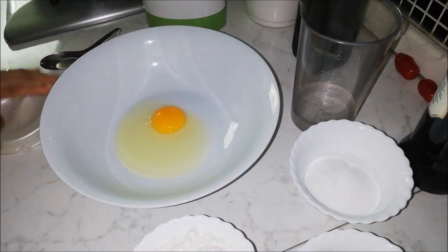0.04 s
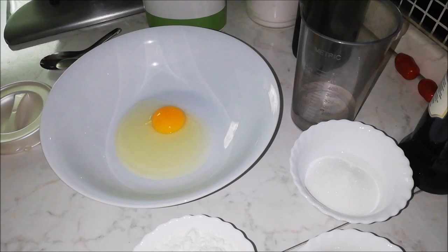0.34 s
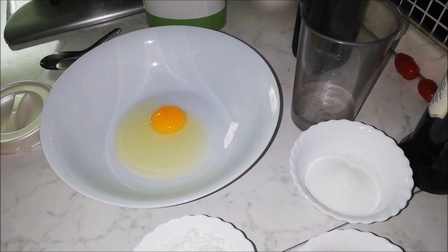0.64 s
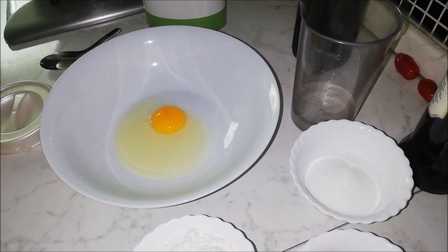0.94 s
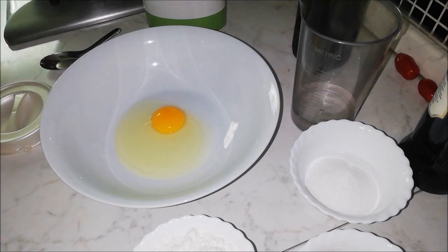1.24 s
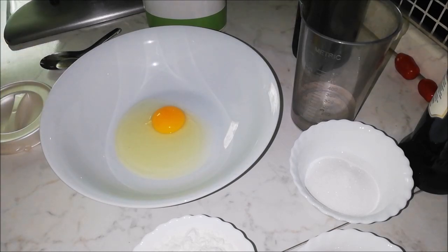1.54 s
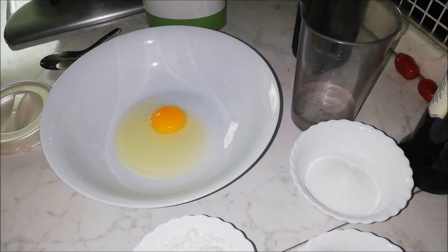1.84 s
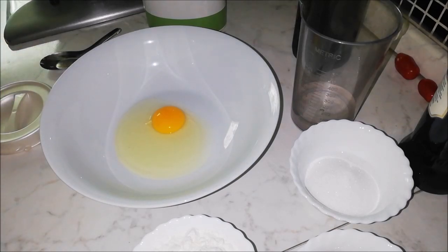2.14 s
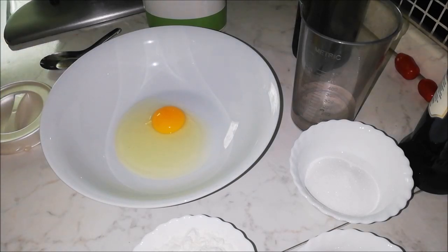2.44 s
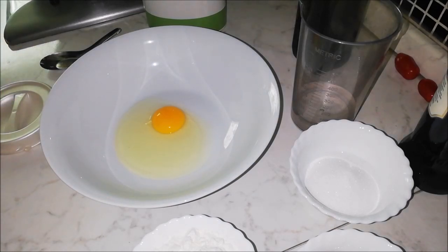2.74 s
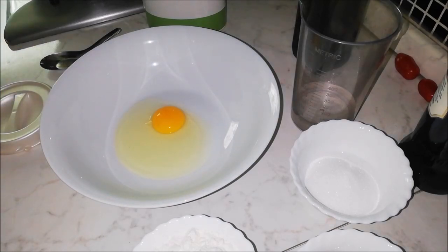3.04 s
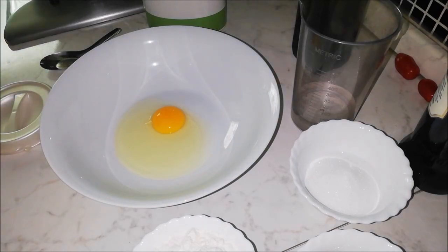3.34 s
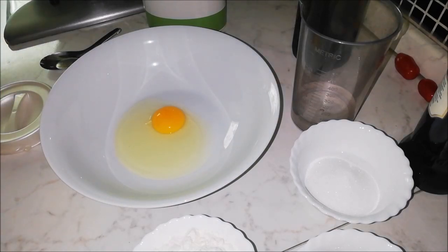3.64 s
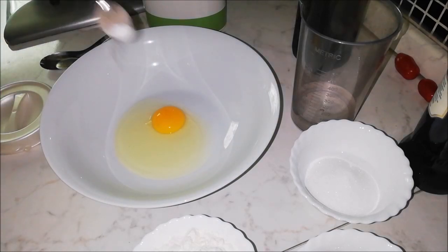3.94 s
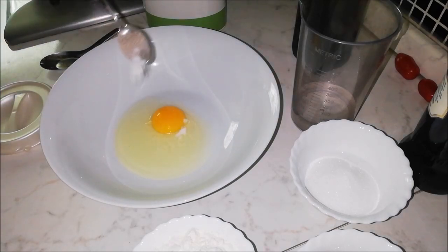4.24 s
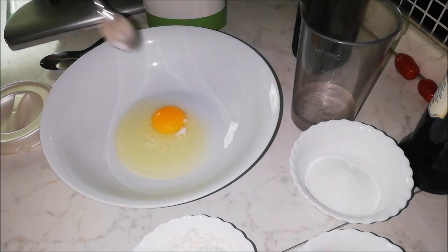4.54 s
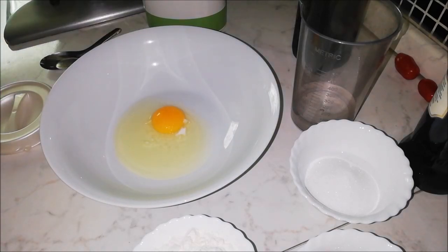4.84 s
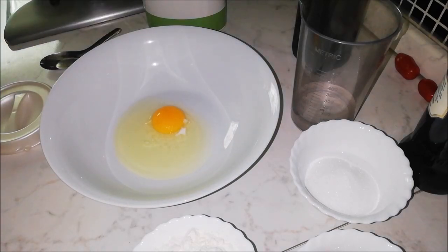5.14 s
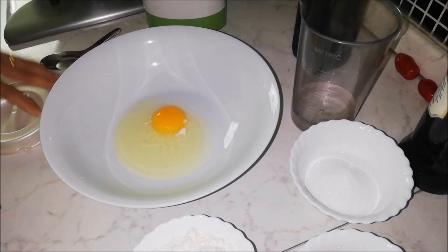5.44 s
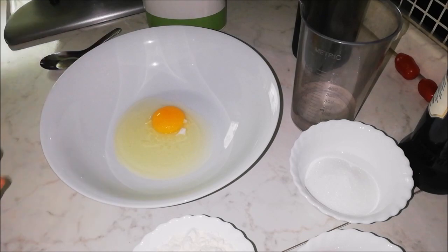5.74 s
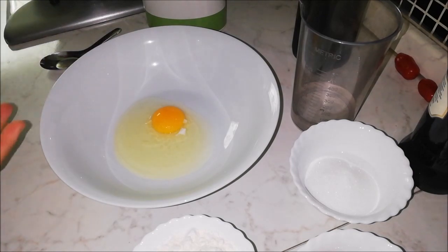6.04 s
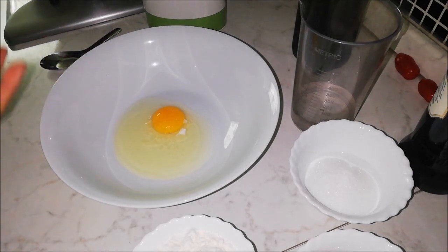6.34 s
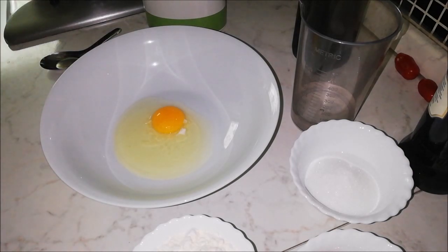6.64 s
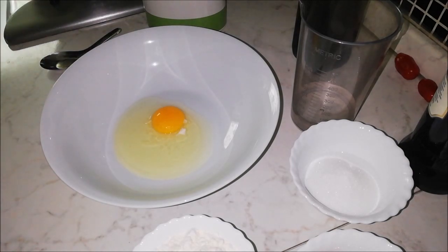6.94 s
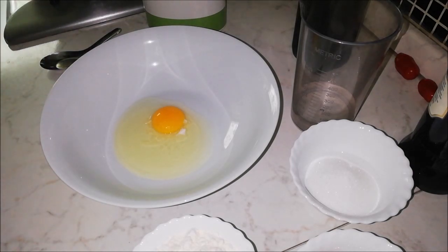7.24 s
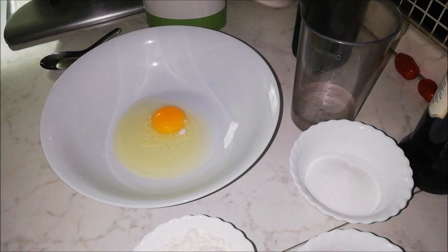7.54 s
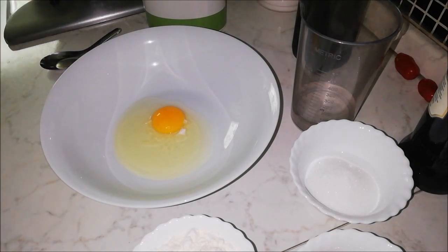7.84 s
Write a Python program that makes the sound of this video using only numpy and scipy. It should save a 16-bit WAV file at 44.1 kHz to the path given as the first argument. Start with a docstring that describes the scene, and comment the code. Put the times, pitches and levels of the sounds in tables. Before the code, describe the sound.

Soft scraping of a spoon in salt, a bright metal clatter and dull knocks of containers on a kitchen counter, over a faint hum.

```python
"""Salt at a kitchen counter

A hard lid is put down on stone and rocks to rest. A steel spoon scoops salt, sprinkles it into a bowl
and drops back into its container. The lid is pressed shut and containers are set down with dull knocks.
Each blow makes the things it hits ring and echoes in a small tiled kitchen, over a faint appliance hum."""
import sys
import numpy as np
from scipy import signal
from scipy.fft import rfft, irfft, next_fast_len
from scipy.io import wavfile
from scipy.ndimage import uniform_filter1d, map_coordinates

SR = 44100
rng = np.random.default_rng(int(sys.argv[2]) if len(sys.argv) > 2 else 0)


def transcribe(signal):
    """Save signal, clipped to [-1, 1], as a 16-bit WAV file at the path in sys.argv[1]."""
    frames = np.atleast_2d(signal).T
    limited = np.clip(frames, -1, 1)
    pcm = np.round(limited * 32767).astype(np.int16)
    wavfile.write(sys.argv[1], SR, pcm)


N = 352452
CLOCK = np.arange(N) / SR  # seconds into the scene
SIZE = 32768  # samples in one blow
T = np.arange(SIZE) / SR  # seconds into one blow
HZ = np.fft.rfftfreq(SIZE, 1 / SR)  # the frequencies in one blow


def lid():
    """The hard lid clacks on stone, rings and rocks to rest."""
    # each touch on the counter: start_s, level_db, brightness
    hits = [(0.0366, -15, -0.5), (0.039, -21.5, 1), (0.0503, -20.5, -2), (0.056, -26.5, -0.5),
            (0.438, -47.5, -1.5), (0.726, -54, -1), (0.979, -54, 0.5), (1.217, -57.5, -2),
            (1.436, -50, -1.5)]
    # tone of the clack: pitch_hz, level_db
    tone = [(47, -38), (80, -8), (162, -20.5), (230, -11.5), (358, -15.5), (391, -8), (1500, -2.5),
            (1670, -3.5), (3780, -8.5), (9130, -20.5), (14500, -37), (15500, -77)]
    # the lid's short notes: pitch_hz, width_hz, level_db
    short_notes = [(587, 48, -7), (853, 68, 7.5), (1130, 27, -0.5), (1183, 31, 6), (1204, 34, -10),
                   (1396, 19, 5), (2025, 36, 4.5), (2200, 18, -4.5), (2360, 24, -16), (3380, 97, -8.5),
                   (3760, 60, -2)]
    # its lasting notes: pitch_hz, level_db, fade_s
    long_notes = [(576, -7, .55), (1177, -3.5, .45), (1445, -4.5, 0.83), (1560, -2.5, .43), (2076, 4.5, .5),
                  (2546, -12.5, .41), (3316, -5, .44)]
    out = np.zeros((2, N))
    clack, body = tone_filter(along(tone, HZ)), resonances(short_notes)
    for start_s, level_db, brightness in hits:
        contact = hardness(brightness) * paths(pan_db=0.5, left_lag_ms=-0.21, chatter=(4, 0.027),
                                               nearby=(4.5, 0.038), room_db=0.5)
        hit = struck(clack * contact) + amp(-7.5) * struck(body * contact) + amp(-17) * ring(long_notes)
        add(out, start_s, amp(level_db + 25.5) * hit)
    return out


def spoon():
    """The steel spoon chatters against the container wall; the salt damps its ring."""
    # each tap on the wall: start_s, level_db, pan (above 0 is left), brightness
    hits = [(1.710, -17, 6, 0.2), (1.723, -31.5, 9, -4.5), (2.7138, -42.5, 2, -5), (2.975, -47.5, 2, -4.5),
            (3.219, -35, 2, 5.5), (5.0159, -19.5, 16, -1.5), (5.029, -23, 0, -3), (5.184, -28.5, -7.5, 6),
            (5.190, -28.5, 6, 1.5), (5.214, -4, 2.5, 1), (5.2176, -15.5, -19, 2),
            (5.2434, -16.5, -3.5, -0.5), (5.535, -41, -6, 4), (6.022, -24.5, 4, 2.5),
            (7.332, -46.5, 10, -1.5)]
    # tone of the clink: pitch_hz, level_db
    tone = [(70, -38), (130, -17.5), (400, -8), (850, -10.5), (1310, -5.5), (2000, -5.5), (2550, -1),
            (3300, -4.5), (4900, -2.5), (7900, -7.5), (9300, -3.5), (11000, -11.5), (13400, -20),
            (15800, -31.5)]
    # the steel's short notes: pitch_hz, width_hz, level_db
    short_notes = [(1320, 82, -8), (2074, 120, -4), (2710, 21, -11), (2890, 110, 7), (3650, 53, 4.5),
                   (4480, 74, 8), (4860, 120, -1), (5410, 81, -0.5), (7800, 65, -4.5), (9060, 31, 0),
                   (9600, 260, -17), (10300, 130, -3), (12800, 35, -14)]
    # its lasting notes: pitch_hz, level_db, fade_s
    long_notes = [(1323, 2, 0.26), (2930, 5, 0.37), (3680, -3, 0.31), (4974, -9, 0.57), (5470, 0, 0.62),
                  (8731, -7, .3), (13100, -7, .3)]
    out = np.zeros((2, N))
    clink, body = tone_filter(along(tone, HZ)), resonances(short_notes)
    for start_s, level_db, pan, brightness in hits:
        chatter_db = 14 + 0.22 * level_db  # stronger blows chatter more
        contact = hardness(brightness) * paths(1.1 * pan, left_lag_ms=-0.3, chatter=(chatter_db, 0.029),
                                               nearby=(2, 0.18), room_db=1)
        hit = struck(clink * contact) + amp(-6.5) * struck(body * contact) + amp(-21.5) * ring(long_notes)
        add(out, start_s, amp(level_db + 16.5) * hit)
    return out


def knocks():
    """Each blow bends and rings a container wall, booms in the counter and clicks at the rim."""
    # dull blows: start_s, wall_db, wall_hz, sharpness (higher rings longer), boom_db, click_db, pan_db
    hits = [(0.561, -42, 220, 2.7, -18.5, -61, -11), (0.603, -31, 264, 2.2, -16.5, -65, -6),
            (1.710, -17.5, 810, 4, -28.5, -17, 8), (5.141, -25.5, 393, 10, -29.5, -54.5, -5),
            (5.535, -22, 420, 2.4, -26, -42, 2), (5.566, -23, 480, 2.5, -22, -58, 2.5),
            (6.021, -8.5, 550, 4.2, -28, -24.5, 4), (6.039, 1.5, 580, 1.4, -13, -1, 2),
            (6.049, -3.5, 1490, 9.5, -16, -22, 2), (6.065, 0.5, 347, 6, -15.5, -32, 7),
            (6.134, -18, 200, 1.2, -6.5, -44, 6), (6.155, 5.5, 635, 0.75, -3, 1.5, 2.5),
            (6.298, -8.5, 854, 1.9, -27, -24.5, 10), (6.302, -14, 278, 3.2, -5.5, -34, -7),
            (6.431, -22, 241, 1.6, -11.5, -42, -3), (7.4568, 5.5, 770, 0.75, -3, -6.5, -2),
            (7.459, 6, 257, 0.89, 3, -8, -2), (7.912, 7.5, 947, 2.1, -3, -10, -4),
            (7.914, -5.5, 380, 1.2, -4.5, -13, -1), (7.934, -5, 810, 1.2, -8, -15.5, -1.5)]
    # the containers' hollow notes: pitch_hz, width_hz, level_db
    hollow_notes = [(590, 31, 0), (963, 26, 3.5), (1330, 23, -12), (1540, 30, -13)]
    # the counter's low notes: pitch_hz, width_hz, level_db
    counter_notes = [(105, 28.6, 6), (131, 24, 3), (217, 41, -7.5), (284, 47, -11.5)]
    # tone of the rim's click: pitch_hz, level_db
    click_tone = [(200, 0), (900, -8), (1500, -1), (2800, -4.5), (4500, -6.5), (7000, -11), (9500, -10.5),
                  (12000, -25), (16000, -41)]
    # how well the wall gives off sound: pitch_hz, level_db
    wall_tone = [(30, -59), (100, -4), (165, -7), (215, -0.5), (300, 0.5), (380, 1.5), (480, -2.5),
                 (620, 3), (1300, 4), (1700, -3.5), (2500, 2.5), (8000, -13)]
    out = np.zeros((2, N))
    rim, counter = tone_filter(along(click_tone, HZ)), resonances(counter_notes)
    wall_filter = tone_filter(along(wall_tone, HZ))
    for start_s, wall_db, wall_hz, sharpness, boom_db, click_db, pan_db in hits:
        left_lag_ms = -0.537 * np.tanh(pan_db / 2)  # the nearer ear hears it first
        bend = 1 / (1 - (HZ / wall_hz) ** 2 + 1j * HZ / (wall_hz * sharpness))
        overtone = resonances([(2.6 * wall_hz, 60, -10)])
        wall = wall_filter * (bend - overtone)
        hollow = bend * resonances(hollow_notes)
        soft = paths(pan_db, left_lag_ms, chatter=(-5, 0.021), nearby=(-4.5, 0.055), room_db=-8.5)
        deep = paths(0, 0, chatter=(-26, 0.021), nearby=(-4, 0.043), room_db=-8.5)
        hard = paths(pan_db, left_lag_ms, chatter=(4, 0.024), nearby=(-1, 0.075), room_db=-4)
        add(out, start_s, amp(wall_db) * struck(wall * soft))
        add(out, start_s, amp(wall_db - 15) * struck(hollow * soft))
        add(out, start_s, amp(boom_db) * struck(counter * deep))
        add(out, start_s, amp(click_db) * struck(rim * hard))
    return out


def salt():
    """Scraping strokes crunch over a faint handling rustle; falling grains ping the spoon."""
    # the spoon through salt and the lid on its thread: peak_s, rise_s, fall_s, level_db, steel_db
    strokes = [(0.574, 0.05, 0.11, -55.5, -17), (1.35, 0.063, 0.13, -60.5, -12),
               (1.44, 0.14, 0.068, -54, -21), (1.689, 0.03, 0.13, -43.5, -11),
               (1.81, 0.076, .17, -53.5, -17), (2.136, 0.072, .05, -63, -8),
               (2.72, 0.22, 0.093, -67.5, -0.5), (2.845, 0.019, 0.047, -60.5, -7),
               (2.975, 0.13, .06, -58.5, -3), (3.154, 0.087, 0.086, -53.5, -20),
               (3.25, 0.15, 0.099, -48.5, -5), (5.054, .038, 0.044, -39, -9),
               (5.088, 0.023, 0.015, -33.5, -3), (5.9, 0.73, 0.3, -69, -6),
               (6.143, 0.024, 0.068, -35.5, -10), (6.296, .09, 0.1, -49, -17),
               (6.442, .03, 0.038, -60.5, -2), (6.519, 0.069, 0.24, -61, -6),
               (7.7, 0.07, 0.057, -56.5, -16), (7.9, 0.2, .05, -62.5, -15)]
    # grains that hit the spoon as it tips: start_s, level_db
    sprinkle = [(4.13, -69), (4.18, -59), (4.265, -50), (4.44, -61), (4.585, -73)]
    # the notes of one ping: pitch_hz, level_db, fade_s
    ping_notes = [(8764, 3, 0.21), (10325, 1, 0.16), (7617, -5, .15), (6500, -8, 0.18)]
    grains, steel = crunch()
    out = amp(-74.5 + 2.5 * wobble(4.244)) * grains  # the rustle
    for peak_s, rise_s, fall_s, level_db, steel_db in strokes:
        swell = np.interp(CLOCK, [peak_s - rise_s, peak_s, peak_s + fall_s], [0, 1, 0]) ** 1.46
        out += amp(level_db) * swell * (grains + amp(steel_db) * steel)
    for start_s, level_db in sprinkle:
        add(out, start_s, amp(level_db + 19.5) * ring(ping_notes) * (1 - fade(T, 0.028)))
    echoes = struck(paths(0, 0, chatter=(-8.5, 0.0019), nearby=(-9, 0.074), room_db=-13.5))
    return signal.fftconvolve(out, echoes, axes=1)[:, :N]


def crunch(spread_db=3.5):
    """Two sounds: salt grains of many sizes rubbing, and the ring they stir up in the spoon."""
    # tone of the salt: pitch_hz, level_db
    tone = [(300, -8.5), (800, -15), (1500, -3.5), (2100, -0.5), (3000, -6), (4500, -6), (6000, -5),
            (9500, 1), (10800, -5), (12200, -11), (15800, -21.5)]
    # the rubbed spoon's notes: pitch_hz, width_hz, level_db
    steel_notes = [(9300, 480, 10.5), (10550, 830, -5.5), (4650, 1100, 7), (2230, 1100, -5.5)]
    sizes = amp(spread_db * unit(uniform_filter1d(rng.standard_normal(N), size=40)))
    grains = rng.standard_normal((2, N)) * sizes
    steel = signal.fftconvolve(grains, irfft(resonances(steel_notes))[None], axes=1)[:, :N]
    return unit(coloured(grains, tone)), unit(steel)


def room_air():
    """The room's steady low rumble and soft hiss."""
    # tone of the air: pitch_hz, level_db
    tone = [(20, -17), (27, -8.5), (36, -18), (48, -8.5), (70, -21), (100, -21.5), (200, -27.5),
            (320, -31.5), (500, -32.5), (1650, -34), (2600, -38), (3600, -36), (5200, -40.5), (9560, -39),
            (12000, -44.5), (15800, -47.5)]
    air = coloured(room_noise(N), tone)
    hiss = coloured(air, [(250, -100), (300, 2)])  # the part above the bass sets the level
    return amp(-62.5) * air / np.std(hiss)


def appliance(hum_hz=49.7, swell_s=0.092):
    """An appliance hums and whines faintly, wavering in level and pitch."""
    # the hum's slow rise and fall: time_s, level_db
    hum_levels = [(0, -57), (2.8, -54.5), (4.4, -62), (7.99, -58)]
    # its brief swells and dips: time_s, change_db
    swells = [(0, 16), (1.58, 13), (3.132, 7), (3.36, -10), (3.67, 5.5)]
    # the thin high tones: pitch_hz, level_db
    whine_notes = [(1927, -81.5), (2966, -79.5), (3558, -77.5), (3607, -79.5), (3854, -84), (6471, -85.5),
                   (8204, -91), (9426, -94)]
    phase = 2 * np.pi * hum_hz * CLOCK
    swell_db = sum(db * np.exp(-((CLOCK - time_s) / swell_s) ** 2) for time_s, db in swells)
    hum_db = np.interp(CLOCK, *np.transpose(hum_levels)) + swell_db + 1.5 * wobble(5)
    hum = amp(hum_db) * np.sin(phase + 0.608 * wobble(2.2))
    waver = lambda: amp(1.5 * wobble(8.2))
    jitter = lambda: 1.95 * np.array([wobble(25), wobble(25)])
    overtones = sum(amp(db) * waver() * np.sin(multiple * phase + 0.65 * wobble(6.5))
                    for multiple, db in [(2, -63), (3, -73)])
    whine = sum(amp(db) * waver() * np.sin(2 * np.pi * hz * CLOCK + jitter()) for hz, db in whine_notes)
    return hum + overtones + whine


def paths(pan_db, left_lag_ms, chatter, nearby, room_db):
    """Filter for one contact: the direct push, its chatter, echoes off nearby dishes, the room."""
    # how long the kitchen echoes: pitch_hz, fade_s
    echo_times = [(100, 0.61), (300, 0.71), (800, 0.66), (2000, 0.77), (5000, 0.61), (9000, 0.56),
                  (14000, 0.36)]
    chatter_db, chatter_s = chatter
    nearby_db, nearby_s = nearby
    side = np.array([[0.5], [-0.5]])  # left, right
    delay = np.exp(-2j * np.pi * HZ * (1 + side * left_lag_ms) / 1000)
    build_up = 1 - fade(T, 0.014)
    rattle = amp(chatter_db) * unit_energy(room_noise(SIZE) * fade(T, chatter_s))
    dishes = amp(nearby_db) * unit_energy(room_noise(SIZE) * fade(T, nearby_s) * build_up)
    hz, t, bands = signal.stft(room_noise(SIZE), SR, nperseg=256)
    bands *= fade(t, along(echo_times, hz)[:, None])
    tail = signal.istft(bands, SR, nperseg=256)[1][:, :SIZE]
    room = amp(room_db) * unit_energy(tail * build_up)
    direct = amp(side * pan_db) * (1 + rfft(rattle))
    return delay * (direct + rfft(dishes + room))


def room_noise(size):
    """Even noise, alike in both ears in the bass and unrelated in the treble."""
    # how alike the two sides are: pitch_hz, likeness (0 to 1)
    likeness = [(60, 0.92), (150, .85), (400, 0), (1000, 0), (10000, 0)]
    angle = np.arccos(along(likeness, np.fft.rfftfreq(size, 1 / SR))) / 2
    noise = rfft(rng.standard_normal((2, size)))
    mid, side = irfft(noise * [np.cos(angle), np.sin(angle)], size)
    return np.array([mid + side, mid - side])


def ring(notes, blur_radians=0.9):
    """Fading, slightly wavering notes, at new strengths for each blow and each side."""
    out = np.zeros((2, SIZE))
    for hz, db, fade_s in notes:
        strength = amp(db + rng.normal(0, 0.77, (2, 1)))
        phase = 2 * np.pi * (hz * T + rng.random((2, 1))) + blur_radians * wobble(60, SIZE)
        out += strength * fade(T, fade_s) * np.sin(phase)
    return unit_energy(out)


def resonances(notes):
    """Filter for an object that rings at its own notes; narrower notes ring longer."""
    return sum((-1) ** k * amp(db) * 1j * HZ * width / (hz * hz - HZ ** 2 + 1j * HZ * width)
               for k, (hz, width, db) in enumerate(notes))


def hardness(brightness):
    """A harder contact has more treble: a filter tilted by up to 4 dB an octave either way."""
    return tone_filter(np.clip(brightness, -4, 4) * np.log2((HZ + 350) / 4000))


def tone_filter(db):
    """Filter with a level for each frequency, making no sound before the blow."""
    cepstrum = irfft(np.log(amp(db) + 1e-6))
    cepstrum[1:SIZE // 2] *= 2  # fold the part before the blow onto the part after it
    cepstrum[SIZE // 2 + 1:] = 0
    return np.exp(rfft(cepstrum))


def struck(response):
    """The sound of one tap through a filter, faded out at its end."""
    return unit_energy(irfft(response) * np.minimum(1, 10 * (1 - T / T[-1])))


def coloured(x, tone):
    """Shape a sound with a table of pitch_hz, level_db."""
    size = next_fast_len(N + SIZE)
    gain = amp(along(tone, np.fft.rfftfreq(size, 1 / SR)))
    return irfft(rfft(x, size) * gain, size)[..., :N]


def wobble(rate, size=N):
    """A smooth curve through rate random points a second."""
    points = rng.standard_normal(int(size * rate / SR) + 4)
    return map_coordinates(points, [CLOCK[:size] * rate], order=3, mode="mirror")


def along(points, hz):
    """Read between the rows of a pitch_hz, value table, with octaves evenly spaced."""
    pitches, values = np.transpose(points)
    return np.interp(np.log(hz + 1), np.log(pitches + 1), values)


def fade(t, fade_s):
    """Die away by 60 dB in fade_s seconds."""
    return np.exp(-np.log(1000) * t / fade_s)


def amp(db):
    """Turn decibels into a multiplier."""
    return 10 ** (np.asarray(db) / 20)


def unit(x):
    """Scale to an average (rms) level of 1."""
    return x / np.sqrt(np.mean(x ** 2) + 1e-20)


def unit_energy(x):
    """Scale to an average energy of 1 per side."""
    return unit(x) / np.sqrt(x.shape[-1])


def add(track, start_s, sound):
    """Mix a stereo sound in at start_s."""
    start = round(start_s * SR)
    track[:, start:start + sound.shape[1]] += sound[:, :max(N - start, 0)]


def scene():
    """All the sounds at the counter."""
    return lid() + spoon() + knocks() + salt() + room_air() + appliance()


def record(dry, ceiling=0.68, top_hz=16000):
    """Round off the sharpest peaks and remove everything above top_hz."""
    rounded = dry / (1 + np.abs(dry / ceiling) ** 4) ** (1 / 4)
    size = next_fast_len(N + SIZE)
    kept = np.fft.rfftfreq(size, 1 / SR) < top_hz
    return irfft(rfft(rounded, size) * kept, size)[:, :N]


dry = scene()
out = record(dry)
transcribe(out)
```